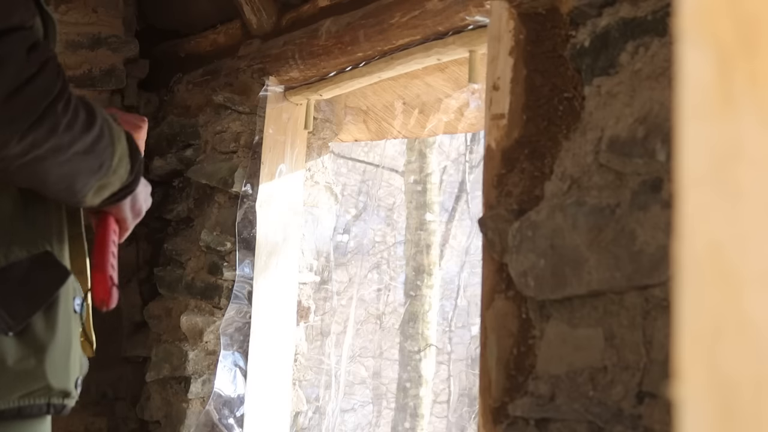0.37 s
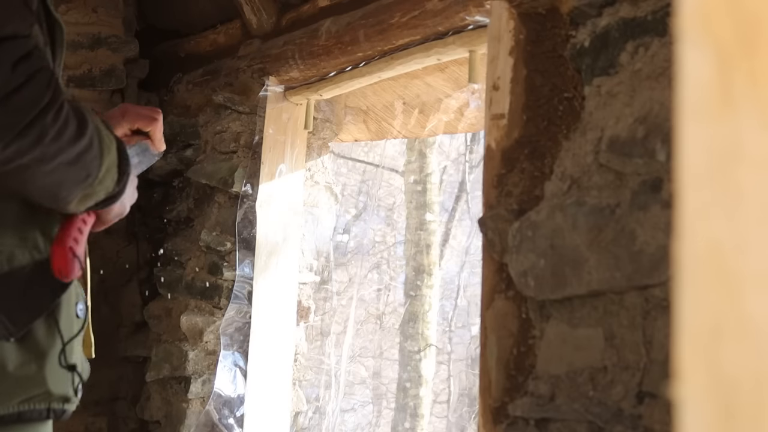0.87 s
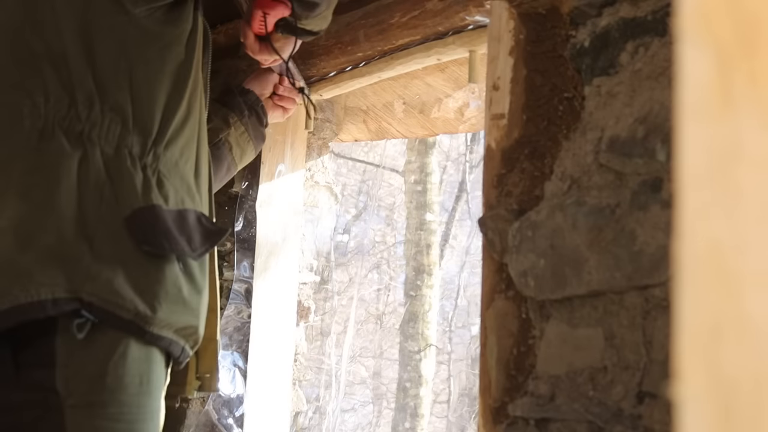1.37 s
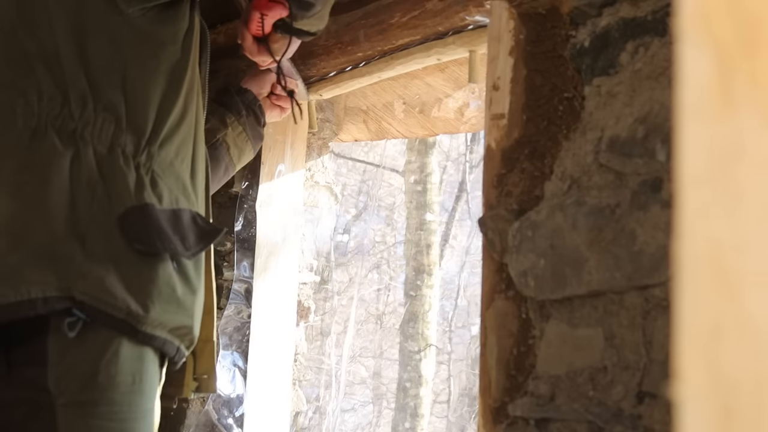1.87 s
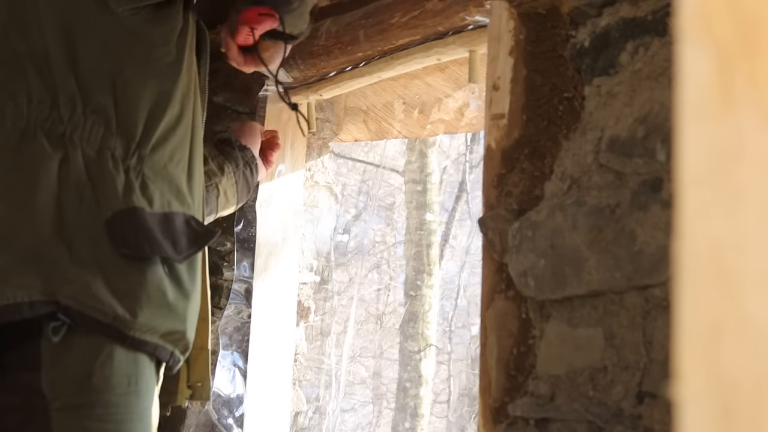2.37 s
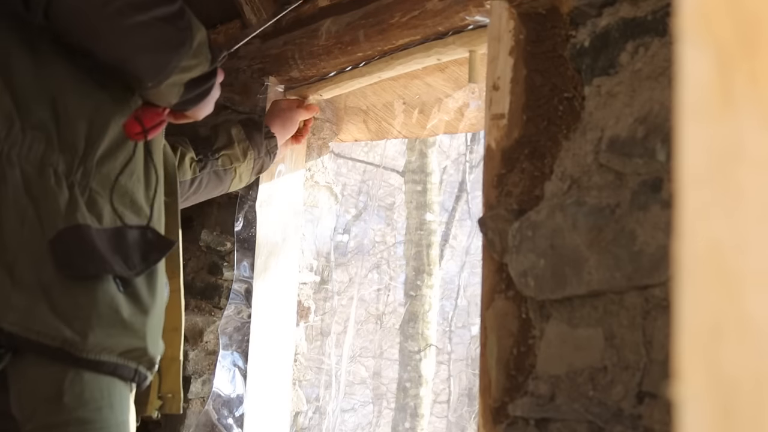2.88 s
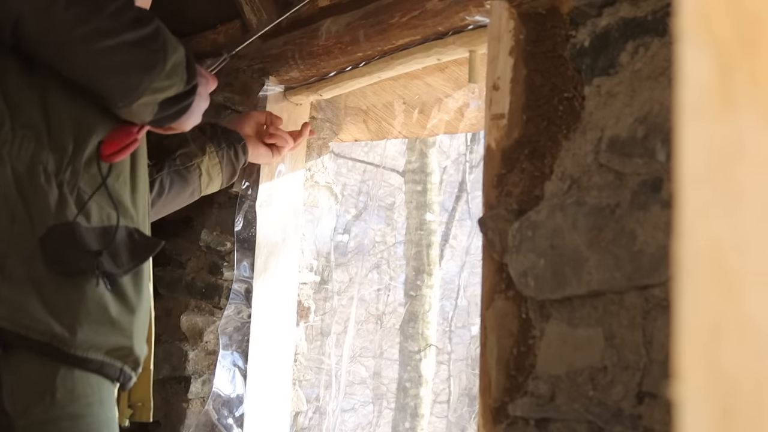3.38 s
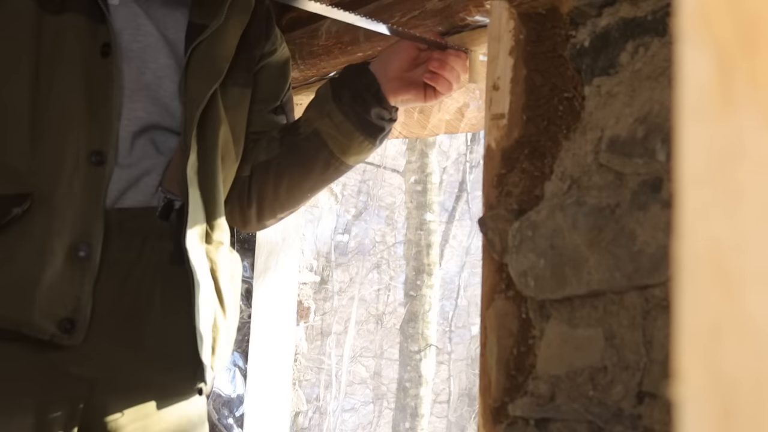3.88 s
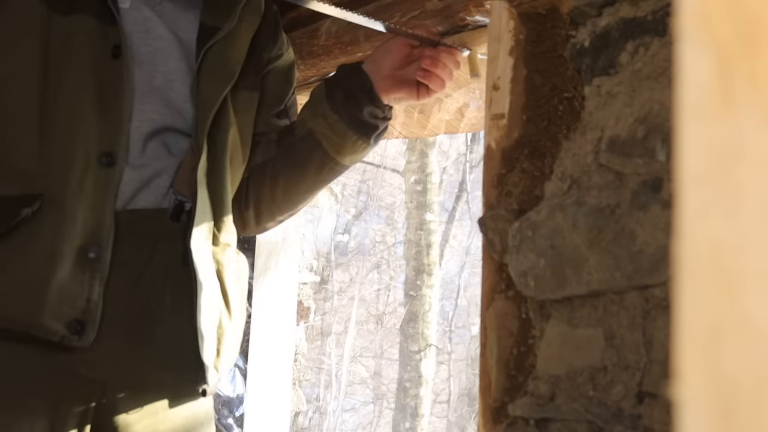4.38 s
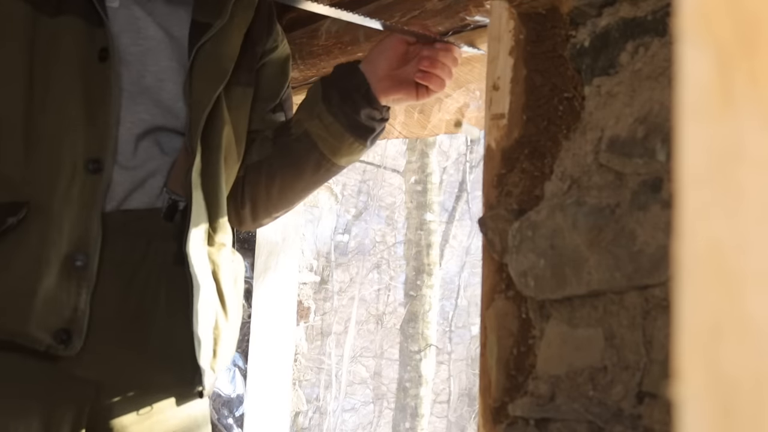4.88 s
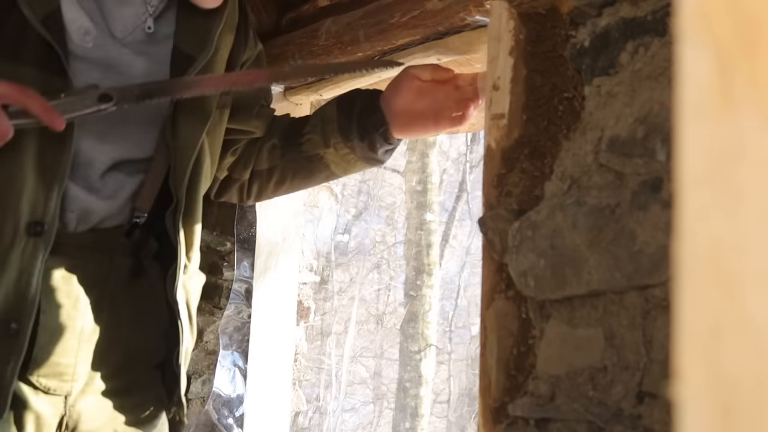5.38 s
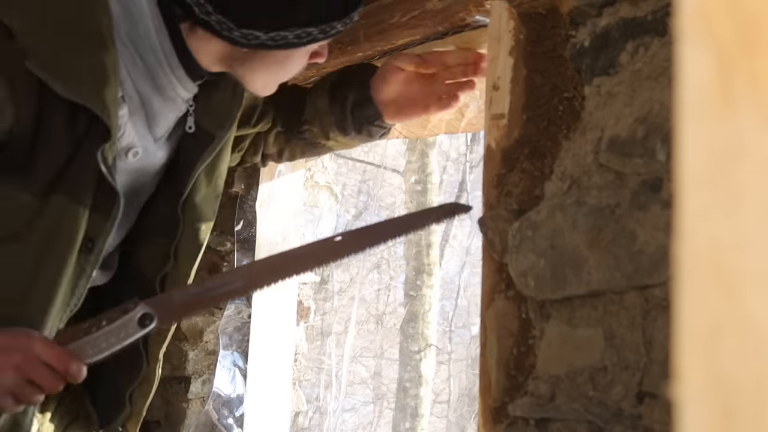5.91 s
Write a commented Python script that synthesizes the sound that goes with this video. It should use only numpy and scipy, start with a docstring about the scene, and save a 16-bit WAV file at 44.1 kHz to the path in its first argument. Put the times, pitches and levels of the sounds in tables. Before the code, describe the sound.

Close in a small stone hut, cloth and hands rustle softly, then faint metal clinks end in one very loud, quickly muted steel snap. Six faint short saw strokes follow with a knock, then handling and a hard woody crack. A longer saw rasps in quick uneven strokes, pauses, and a cluster of wooden knocks ends it. Short dry echoes, steady hiss; sound on the left only.

```python
"""Trimming a wooden window frame

Inside a small stone hut a steel tool clinks, makes a run of short strokes, then a long saw cuts in.
Strokes are dense random clicks ringing wood and steel; knocks and ticks are short pushes and noise bursts.
Clinks are fading sines; hands, a jacket and other soft hiss are filtered clicks; rough stone adds echoes.
One microphone feeds the left input; the right input carries only its own hiss."""
import sys
import numpy as np
from scipy import signal
from scipy.io import wavfile

SR = 44100
rng = np.random.default_rng(int(sys.argv[2]) if len(sys.argv) > 2 else 0)


def bounce(signal):
    """Save signal as a 16-bit WAV file at the path given by the first command-line argument."""
    frames = np.transpose(np.atleast_2d(signal))
    limited = np.clip(frames, -1, 1)
    pcm = np.round(limited * 32767).astype(np.int16)
    wavfile.write(sys.argv[1], SR, pcm)


def rack_gain(trim_db):
    """Turn a fader trim in dB into the linear factor to multiply a signal by."""
    fader = np.asarray(trim_db, float)
    return 10 ** (fader / 20)


N = 265482

# resonances of the wooden frame: (pitch [Hz], basic width [Hz], relative level [dB])
FRAME_MODES = [(109, 17.6, -13.5), (133, 26, -12), (206.7, 33.7, -2.5), (302, 60, -2), (381, 23.7, 1),
               (417.2, 27.3, 0.5), (516, 34, -4.5), (577, 32.4, -6), (645, 29.5, -4), (733, 33.5, -8.5),
               (887, 70, -4), (1002, 41, -8.5), (1170, 51, -20), (1583, 77, -15), (2210, 600, -17)]


def in_time(rows):
    """Draws straight lines between the rows of a curve: one value per column at every sample."""
    s, *columns = np.transpose(rows)
    return np.array([np.interp(np.arange(N) / SR, s, c) for c in columns])


def rms_one(x):
    """Scales a sound to an average strength (rms) of 1."""
    return x / np.sqrt(np.mean(x ** 2) + 1e-30)


def coloured(x, spectrum):
    """Filters a sound to a spectrum, with minimum phase so that nothing sounds before its cause."""
    hz, level_db = np.transpose(spectrum)
    grid = np.linspace(0, SR / 2, 1025)
    # minimum_phase takes the square root of the gain, so the level is doubled first
    doubled_db = 2 * np.interp(np.log(grid + 1), np.log(hz), level_db)
    wide = signal.firwin2(2047, grid, rack_gain(doubled_db) + 1e-9, fs=SR)
    response = rms_one(signal.minimum_phase(wide)) / 32  # 1024 taps, total energy 1
    return signal.fftconvolve(x, response)[:N]


def resonance(x, hz, width_hz):
    """Rings at one pitch with a two-pole filter; white noise of rms 1 comes out at about rms 1."""
    r = np.exp(-np.pi * width_hz / SR)
    feed = np.sqrt((1 - r * r) / 2) * np.array([1, 0, -1])
    return signal.lfilter(feed, [1, -2 * r * np.cos(2 * np.pi * hz / SR), r * r], x + 1e-18)


def drift(rate):
    """Wanders slowly by chance: random points, so many per second, joined by straight lines."""
    knots = rng.standard_normal(int(rate * N / SR) + 2)
    return np.interp(np.arange(N) / SR * rate, np.arange(len(knots)), knots)


def grains(per_s, spread_db):
    """Scatters random clicks of uneven size and either sign; rms 1."""
    sizes = rack_gain(spread_db * np.minimum(rng.exponential(1, N), 5)) * rng.choice([-1, 1], N)
    return rms_one(sizes * (rng.random(N) < per_s / SR))


def near(hz, centre_hz, db_per_octave):
    """Gain that falls with the distance between a pitch and a favoured centre."""
    return rack_gain(-db_per_octave * np.abs(np.log2(hz / centre_hz)))


def body(drive, modes, weight=lambda hz: 1):
    """Rings resonances side by side with alternating sign; a drive of rms 1 gives about rms 1."""
    total = np.sqrt(sum(rack_gain(2 * db) for hz, width, db in modes))
    ringing = 0
    for k, (hz, width, db) in enumerate(modes):
        ringing = ringing + (-1) ** k * rack_gain(db) * resonance(drive * weight(hz), hz, width)
    return ringing / total


def cracks(s, peak_db, centre, length_s, tilt_db):
    """Bursts of noise that die in a few ms, each brightest near its own centre."""
    out, noise = 0, rng.standard_normal((2, N))
    for k, hz in enumerate(np.geomspace(1200, 14000, 11)):  # bands of a crack, in Hz
        blow = np.zeros(N)
        blow[(s * SR).astype(int)] = rack_gain(peak_db) * near(hz, centre, tilt_db)
        fading = signal.lfilter([1], [1, -np.exp(-1 / (length_s * SR))], blow + 1e-18)
        burst = fading * noise[k % 2]
        out = out + (-1) ** (k // 2) * resonance(burst, hz, 0.52 * hz)
    return out


def moving():
    """Hands drag over the frame, a jacket and other soft hiss rustle, and the lowest modes sway and boom."""
    # time [s], hands on wood [dB],
    # jacket and other soft hiss, including the fading hiss after the loud clink [dB]
    rustle_curve = [(0.0, -51.5, -65.5), (0.16, -57, -50), (0.3, -58.5, -65.5), (0.52, -63, -56.5),
                    (0.68, -61, -60.5), (0.79, -57, -55), (1.01, -62, -58), (1.05, -48.5, -49),
                    (1.32, -48, -49), (1.42, -55, -56), (2.26, -62.5, -65), (2.3, -51, -50),
                    (3.0, -53.5, -57.5), (3.5, -58, -59), (4.98, -59, -59), (5.35, -43.5, -52.5),
                    (5.51, -47, -54), (5.535, -45, -41), (5.78, -54, -55), (6.02, -45, -54)]
    # lowest modes of the frame: (time [s], sway [dB], boom [dB])
    low_curve = [(0.0, -43, -63), (0.35, -69, -66.5), (1.24, -68.5, -71.5), (1.27, -64, -47.5),
                 (1.98, -55, -46.5), (2.25, -60.5, -71.5), (3.44, -67.5, -64), (3.54, -40.5, -53),
                 (3.92, -45, -34.5), (4.14, -55, -48.5), (4.38, -34, -46), (4.51, -52, -63.5),
                 (5.1, -58.5, -58), (5.21, -40.5, -36), (5.26, -47.5, -49), (5.87, -69, -66),
                 (5.95, -46, -46), (6.02, -60, -71)]
    # colour of the jacket and other soft hiss: (frequency [Hz], relative level [dB])
    soft_colour = [(710, -20), (1200, -1.5), (1850, -6), (2600, -7), (7160, -9.5), (13500, -22),
                   (15000, -28)]
    hands_db, soft_db = in_time(rustle_curve)
    sway_db, boom_db = in_time(low_curve)

    rubbing = grains(per_s=1000.0, spread_db=2.0) * rack_gain(4.5 * drift(30.))
    hands = body(rubbing, [(hz, 1.53 * width, db) for hz, width, db in FRAME_MODES])
    fine_clicks = grains(per_s=9000., spread_db=-2.5) * rack_gain(2.7 * drift(29.0))
    soft_hiss = rms_one(coloured(fine_clicks, soft_colour))
    rustle = rack_gain(hands_db) * hands + rack_gain(soft_db) * soft_hiss

    sway = rms_one(resonance(rng.standard_normal(N), hz=30, width_hz=22))
    boom = rms_one(resonance(rng.standard_normal(N), hz=77.9, width_hz=9.2))
    return rustle, rack_gain(sway_db) * sway + rack_gain(boom_db) * boom


def ticks():
    """Bare short cracks, too weak to ring the frame."""
    # light ticks: (time [s], level [dB], centre [Hz])
    tick_list = [(1.89, -42, 6470), (1.958, -36, 6000), (2.135, -49, 10400), (2.231, -44, 7850),
                 (2.903, -36, 5330), (3.087, -36.5, 2070), (3.285, -43, 1960), (5.598, -34.5, 2500),
                 (2.303, -51, 1900), (2.665, -50, 1200), (2.847, -51, 2500), (3.212, -48, 8000),
                 (5.314, -34.5, 7000), (5.741, -42.5, 1500), (4.25, -48, 2977)]
    return cracks(*np.transpose(tick_list), length_s=0.0024, tilt_db=8.0)


def knocks():
    """A soft push rings the frame modes near its pitch; a short crack rides on top."""
    # knocks on wood: (time [s], push level [dB], pitch [Hz], crack level [dB], centre of the crack [Hz])
    knock_list = [(0.204, -31, 324, -38, 1730), (0.354, -38.5, 470, -55, 1640),
                  (0.621, -38, 378, -58, 2150), (1.328, -36.5, 375, -39.5, 4470),
                  (1.808, -18, 290, -31, 3100), (2.364, -32.5, 566, -41.5, 3600),
                  (2.441, -31.5, 480, -44, 6400), (2.718, -30.5, 305, -46, 2170),
                  (2.771, -35, 560, -46.5, 2520), (2.992, -17, 614, -17, 5830),
                  (3.336, -42, 614, -50, 1540), (5.166, -19, 202, -36, 1450),
                  (5.214, -22.5, 402, -36.5, 1500), (5.283, -26, 690, -57, 1520),
                  (5.315, -20.5, 680, -30.5, 1530), (5.385, -24.5, 620, -43, 1630),
                  (5.433, -20.5, 202, -27.5, 1660), (5.439, -24.5, 222, -18, 3600),
                  (5.508, -28, 1000, -34, 1520), (5.673, -33, 418, -39, 2880), (5.931, -20, 214, -33, 1530)]
    s, peak_db, pitch, crack_db, centre = np.transpose(knock_list)
    at = ((s + 0.00153) * SR).astype(int)  # the push rings 1.5 ms after the listed time
    chance_db = rng.normal(0, 2.3, (len(at), len(FRAME_MODES)))
    wood = 0
    for k, (hz, width, db) in enumerate(FRAME_MODES):
        push = np.zeros(N)
        push_db = peak_db + 0.12 * db + 15.0 + chance_db[:, k]
        push[at] = rack_gain(push_db) * near(hz, pitch, 8.6) * (-1) ** k
        wood = wood + resonance(push, hz, 2.2 * width) / np.sqrt(width / 30)
    return wood + cracks(s, crack_db - 0.5, centre, length_s=0.0043, tilt_db=9.0)


def clinks():
    """Each clink cracks, pings and rings the tool; a hand then mutes the part it holds."""
    # clinks: (time [s], level [dB], favoured pitch [Hz], ping level [dB], time until muted [s])
    clink_list = [(0.4544, -43, 5800, -59, .1), (.502, -41, 3080, -56, .04),
                  (0.5421, -31, 3500, -26, 0.1174), (0.613, -37, 9500, -52, .05),
                  (0.7369, -19, 2220, -33, 0.12), (0.74, 13.5, 6760, 5, 0.09)]
    # modes of the part in the hand: (pitch [Hz], relative level [dB], time to fall 60 dB [s])
    held_modes = [(1944, 1.5, 0.073), (2070, -31, 0.049), (4410, -29, 0.049), (6060, -10, 0.05),
                  (7266, -9, 0.039), (11100, -50, 0.099), (11270, -19, 0.11)]
    # modes of the part left free: (pitch [Hz], relative level [dB], time to fall 60 dB [s])
    free_modes = [(1853, -57.5, 0.72), (2340, -61, 0.95), (2925, -55.5, 0.84), (4000, -39, 0.27)]
    ping_hz, ping_t60_s = 2150, 0.24
    out, t = np.zeros(N), np.arange(SR // 2) / SR
    for s, peak_db, centre, ping_db, muted_s in clink_list:
        at, phases = int(s * SR), rng.uniform(0, 2 * np.pi, 16)
        mute = rack_gain(-20.5 * np.clip((t - muted_s) / 0.011, 0, 1))  # closes over 11 ms
        held, free = 0, 0
        for (hz, db, t60), phase in zip(held_modes, phases):
            fade = rack_gain(peak_db + db - 60 * t / t60)
            held = held + fade * near(hz, centre, 8.0) * np.sin(2 * np.pi * hz * t + phase)
        for hz, db, t60 in free_modes:
            free = free + rack_gain(peak_db + db - 60 * t / t60) * np.sin(2 * np.pi * hz * t)
        ping = rack_gain(ping_db - 60 * t / ping_t60_s) * np.sin(2 * np.pi * ping_hz * t)
        onset = np.minimum(t / 0.00031, 1)
        out[at:at + len(t)] += ((held + ping) * mute + free) * onset
    s, peak_db, centre = np.transpose(clink_list)[:3]
    return out, cracks(s, peak_db - 7.5, centre, length_s=0.012, tilt_db=6.5)


def stroke_levels(strokes):
    """Wood and steel level (dB): the teeth bite, the cut swells, then dies; the loudest stroke counts."""
    # each pair is for (wood, steel)
    bite_s, swell_db, dies_db_per_s = (0.004, 0.002), (7, 10), (255, 480)
    out, t = np.full((2, N), -120.), np.arange(N) / SR
    for s, length, *peaks, hz in strokes:
        for k, peak_db in enumerate(peaks):
            bite = np.clip((t - s) / bite_s[k], 1e-6, 1)
            below_db = swell_db[k] * (1 - np.clip((t - s) / length, 0, 1)) ** 2
            dying_db = dies_db_per_s[k] * np.maximum(t - s - length, 0)
            out[k] = np.maximum(out[k], peak_db + 20 * np.log10(bite) - below_db - dying_db)
    return out


def saw(strokes, steel, ring_db, tilt_db):
    """Teeth tear fibres in dense uneven clicks that drive the frame, the steel and a broad rasp."""
    # colour of the rasp: (frequency [Hz], relative level [dB])
    rasp_colour = [(530, -39.5), (900, 9.5), (1030, -1), (1620, -6), (5400, -9.5), (7910, -4), (8600, -13),
                   (10300, -13.5), (15600, -17.5)]
    wood_db, steel_db = stroke_levels(strokes)
    centre, = in_time([(s + length / 2, hz) for s, length, *levels, hz in strokes])
    teeth = grains(per_s=1800., spread_db=1.5) * rack_gain(2.0 * drift(90.))
    on_steel = teeth * rack_gain(steel_db)
    # the cut moves, so the modes trade strength
    wood = body(teeth * rack_gain(wood_db), FRAME_MODES, lambda hz: rack_gain(2.14 * drift(14.)))
    rings = body(on_steel, steel, lambda hz: near(hz, centre, tilt_db) * rack_gain(3.3 * drift(22.)))
    rasp = coloured(on_steel, rasp_colour)
    return rack_gain(-1.5) * wood + rack_gain(ring_db) * rings + rack_gain(-4.0) * rasp


def hut(x):
    """Dense echoes off rough stone, made of fading noise; the treble dies sooner."""
    t60_s, treble_t60_s = 0.16, 0.088  # times to fall 60 dB
    t = np.arange(SR // 2) / SR
    noise = rng.standard_normal(len(t)) * np.clip((t - .002) / 0.0031, 0, 1)
    low = signal.sosfilt(signal.butter(1, 1500, fs=SR, output="sos"), noise)
    echoes = low * rack_gain(-60 * t / t60_s) + (noise - low) * rack_gain(-60 * t / treble_t60_s)
    return signal.fftconvolve(x, echoes / np.sqrt(np.sum(echoes ** 2)))[:N]


def scene():
    """All sources meet at one microphone; the second channel is empty."""
    # strokes: (start [s], length [s], wood level [dB], steel level [dB], where the blade rings most [Hz])
    short_strokes = [(1.300, 0.081, -37.5, -51, 2400), (1.432, 0.066, -36.5, -37, 3000),
                     (1.565, 0.04, -30.5, -41.5, 4900), (1.682, 0.035, -32.5, -32, 7430),
                     (1.806, 0.052, -37, -44, 3600), (1.947, 0.032, -40, -37, 6050)]
    long_strokes = [(3.512, 0.061, -26, -30.5, 5340), (3.600, 0.11, -31.5, -39.5, 5200),
                    (3.762, 0.08, -25, -27, 5200), (3.925, 0.094, -34.5, -40, 4400),
                    (4.056, 0.078, -31.5, -34, 4000), (4.240, 0.022, -26, -33, 3800),
                    (4.312, 0.072, -24.5, -23, 3500), (4.740, 0.031, -41, -48.5, 4700),
                    (4.858, 0.021, -27, -36.5, 3700), (4.900, 0.026, -35, -46, 3720)]
    # resonances of the two blades: (pitch [Hz], width [Hz], relative level [dB])
    short_steel = [(1640, 270, 2.5), (2245, 230, 5), (3600, 860, -3.5), (6330, 120, -5.5),
                   (7490, 52, -10.5), (12600, 300, 0)]
    long_steel = [(2870, 150, -3), (3500, 68, 3), (3960, 240, -3), (4400, 99, 1), (4830, 95, -2),
                  (5480, 210, 4.5), (6170, 92, -3), (8220, 540, -17), (10000, 157, -3)]
    rustle, lows = moving()
    blows = ticks() + knocks()
    ring, crack = clinks()
    blows = blows + crack
    cutting = saw(short_strokes, short_steel, ring_db=3.5, tilt_db=6.5)
    cutting = cutting + saw(long_strokes, long_steel, ring_db=-0.5, tilt_db=10.5)
    wet = rack_gain(-1.5) * hut(blows + rack_gain(-5.5) * cutting + rack_gain(-17.0) * ring)
    return np.array([blows + ring + cutting + rustle + lows + wet, np.zeros(N)])


def low_pass(x):
    """Removes everything above the highest recorded frequency."""
    return signal.sosfilt(signal.butter(12, 15770, fs=SR, output="sos"), x)


def record(dry):
    """Each input adds hiss; a linked limiter ducks both just after a loud peak; what is still too loud clips."""
    # colour of the hiss: (frequency [Hz], relative level [dB])
    hiss_colour = [(20, -7), (80, 5), (300, -1.5), (1000, -1.5), (3000, -7.5), (8000, -9.5), (16000, -9.5)]
    mic_db, hiss_db = 6, -55.5
    limit_db, release_db_per_s, reaction_s = -4.5, 157, 0.0023
    hiss = [rack_gain(hiss_db) * rms_one(coloured(rng.standard_normal(N), hiss_colour)) for side in range(2)]
    x = rack_gain(mic_db) * dry + hiss
    level_db = 20 * np.log10(np.abs(x).max(axis=0) + 1e-9)
    over_db = np.maximum(level_db - limit_db, 0)
    # hold each peak and let it go at a steady rate
    release_db = release_db_per_s * np.arange(N) / SR
    held_db = np.maximum(np.maximum.accumulate(over_db + release_db) - release_db, 0)
    r = np.exp(-1 / (reaction_s * SR))
    x = x * rack_gain(-signal.lfilter([1 - r], [1, -r], held_db))
    return low_pass(np.clip(x, -1, 1))


dry = scene()
out = record(dry)
bounce(out)
```